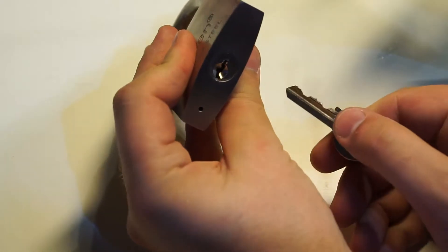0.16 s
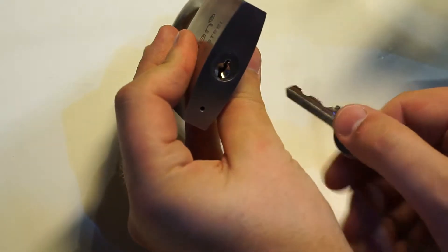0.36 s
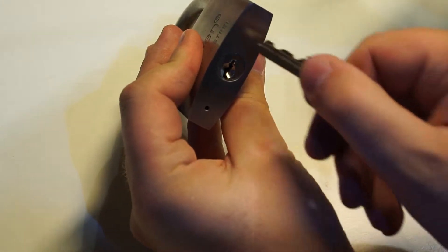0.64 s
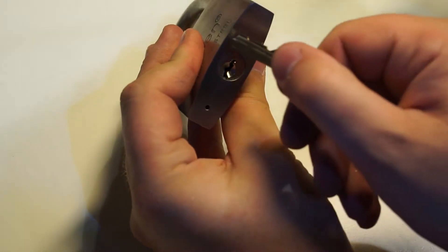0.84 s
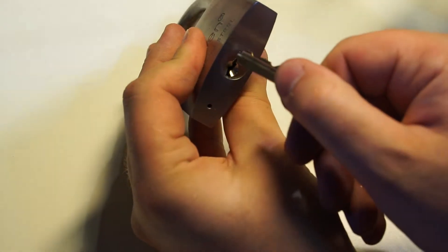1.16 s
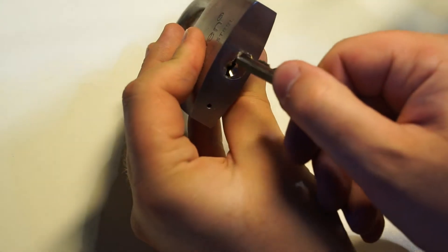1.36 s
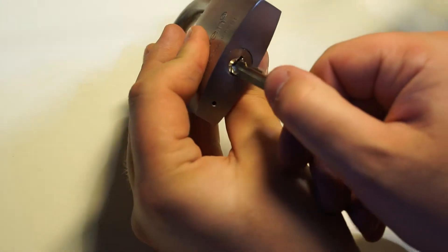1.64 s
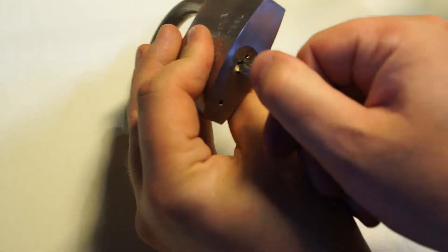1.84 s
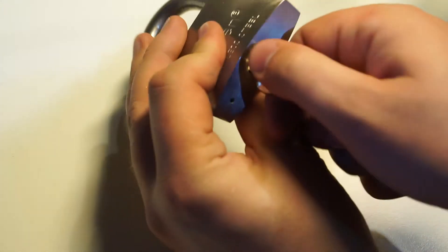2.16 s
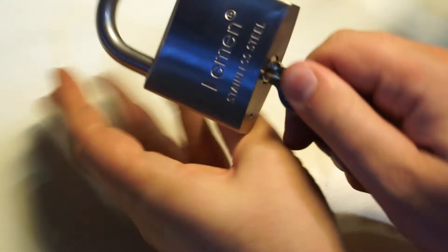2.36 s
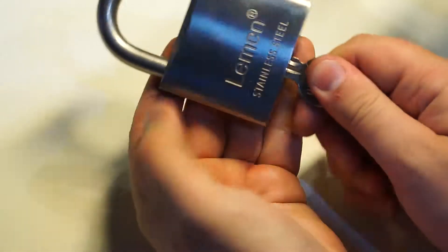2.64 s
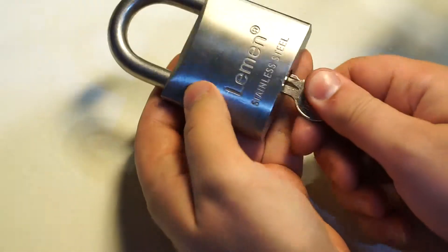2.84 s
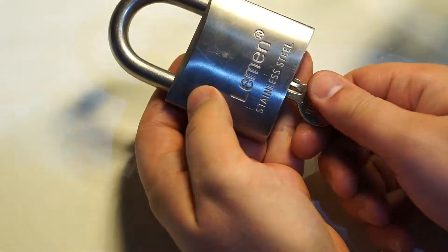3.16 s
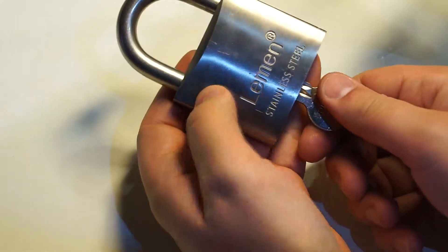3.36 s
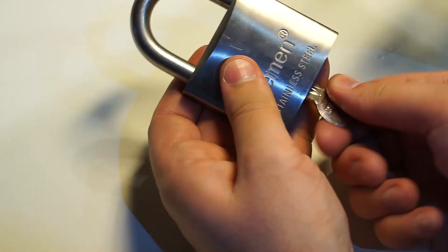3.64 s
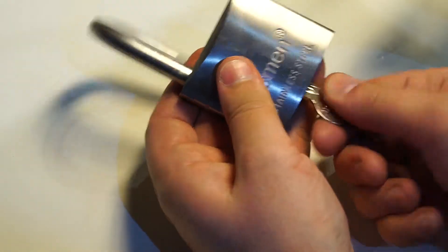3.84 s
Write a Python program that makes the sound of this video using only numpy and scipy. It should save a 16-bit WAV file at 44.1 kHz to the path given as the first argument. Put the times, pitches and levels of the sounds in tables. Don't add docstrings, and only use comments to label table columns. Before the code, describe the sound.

A padlock opens close to the microphone in a small quiet room: faint key taps, a short rasp over pins, soft grip bumps, turning ticks, then a loud rattling shackle clack and one last tick.

```python
import sys
import numpy as np
from scipy import signal
from scipy.fft import rfft, irfft
from scipy.io import wavfile
from scipy.ndimage import uniform_filter1d

SR = 44100
rng = np.random.default_rng(int(sys.argv[2]) if len(sys.argv) > 2 else 0)


def linear_from_db(decibels):
    return 10 ** (np.asarray(decibels, float) / 20)


def master_out(mix):
    frames = np.transpose(np.atleast_2d(mix))
    ceiling = np.clip(frames, -1, 1)
    pcm = np.round(ceiling * 32767).astype(np.int16)
    wavfile.write(sys.argv[1], SR, pcm)


N = 176400

# (time [s], peak level [dB], ring [Hz], dull knock [dB])
SHACKLE_HITS = [(3.7495, -32, 12900, 0), (3.7557, -15, 11500, -5), (3.7594, -7, 14800, -3),
                (3.762, -11, 13000, 0), (3.7648, -6, 13900, -5), (3.7665, -6, 13500, -5),
                (3.768, -6, 7700, -5), (3.7712, -1, 13500, -5), (3.7735, -10, 7700, -5),
                (3.7792, -4, 13000, 3), (3.7812, -6, 13500, 0), (3.784, -10, 12800, 0),
                (3.7872, -9, 13200, 0), (3.7912, -15, 13500, 0), (3.7945, -17, 12800, 0),
                (3.8042, -12, 13700, -3), (3.8062, -15, 7700, 0), (3.8108, -14, 13000, 2),
                (3.8148, -14, 7700, 2), (3.8212, -13, 13100, -5), (3.8265, -16, 13500, 0),
                (3.8475, -20, 10500, 2)]
# (frequency [Hz], density [dB per Hz])
SHACKLE_COLOUR = [(750, -58), (1250, -10.5), (2600, -10.5), (4200, -9.5), (6500, -5.5), (7700, -0.5),
                  (11500, -2.5), (13500, -1.5), (15200, -15)]


def shackle_clack():
    return linear_from_db(0.3) * contacts(SHACKLE_HITS, SHACKLE_COLOUR, crack_s=0.0015, ring_db=-10.5, ring_t60=0.012,
                               knock_hz=4670, body_db=-42)


# (time [s], peak level [dB], ring [Hz], dull knock [dB])
PIN_CLICKS = [(1.9499, -16, 14000, -12), (1.9507, -13, 12700, -12), (1.963, -16, 14200, -8),
              (1.9682, -8, 9500, -8), (1.9768, -15, 13400, -10), (1.9818, -10, 10500, -6),
              (1.9895, -19, 13000, -8), (1.9905, -16, 13600, -6), (1.9958, -21, 10500, 2),
              (1.998, -16, 10800, 2), (2.0036, -18, 11800, 2), (2.0095, -18, 13000, -3),
              (2.0104, -11, 11600, -3), (2.0138, -12, 11800, 4), (2.017, -19, 12000, 0),
              (2.0205, -21, 12000, 0)]
# (frequency [Hz], density [dB per Hz])
KEY_COLOUR = [(900, -60), (1500, -40), (2700, -22), (3800, -11), (5500, -12), (8000, -4), (11500, 3),
              (14800, 3)]


def pin_rasp():
    return linear_from_db(5) * contacts(PIN_CLICKS, KEY_COLOUR, crack_s=0.0004, ring_db=-15, ring_t60=0.005,
                             knock_hz=4100, body_db=-40)


# (time [s], peak level [dB], ring [Hz], dull knock [dB])
KEY_TICKS = [(1.528, -35.5, 12500, 6), (1.6415, -39, 12200, 5), (1.658, -46, 7000, 14),
             (1.8285, -30.5, 14800, 4.5), (1.872, -32, 12300, 2), (1.874, -34.5, 5650, -7),
             (2.3365, -31, 12100, -15), (2.3467, -15, 7700, -6.5), (2.697, -50, 8800, -7),
             (3.415, -44, 3600, 10), (3.6225, -32, 13200, -3), (3.637, -33.5, 7700, 3.5),
             (3.936, -14.5, 12800, 2)]


def key_ticks():
    return contacts(KEY_TICKS, KEY_COLOUR, crack_s=0.00072, ring_db=-19, ring_t60=0.013,
                    knock_hz=4350, body_db=-32)


# (start [s], length [s], level [dB])
METAL_SLIDES = [
    (1.94, .012, -48),
    (1.95, .085, -37),
    (3.7485, .012, -41),
    (3.76, .016, -25),
    (3.792, .08, -25),
]


def metal_slides():
    key = slides(METAL_SLIDES[:2], KEY_COLOUR, body_db=-42, fade=0.25)
    return key + slides(METAL_SLIDES[2:], SHACKLE_COLOUR, body_db=-40, fade=0.25)


# (start [s], length [s], level [dB])
KEY_CHATTER = [
    (1.529, 0.013, -50),
    (1.642, 0.028, -55),
    (1.829, 0.016, -47),
    (1.872, .018, -48),
    (2.3475, .013, -33),
    (3.637, 0.11, -54),
    (3.937, 0.011, -40),
]


def key_chatter():
    return slides(KEY_CHATTER, KEY_COLOUR, body_db=-49, fade=1)


# (start [s], length [s], level [dB])
KEY_SEATING = [
    (1.975, 0.024, -43),
    (1.994, 0.031, -40.5),
]
# (frequency [Hz], density [dB per Hz])
PLUG_COLOUR = [(800, -15), (1400, -6), (2200, 5.5), (3800, -5.5), (5500, 4), (8000, -24)]


def key_seating():
    return slides(KEY_SEATING, PLUG_COLOUR, body_db=-60, fade=0.63)


# (frequency [Hz], level [dB], t60 [s])
BODY_MODES = [(4100, -12, .02), (5475, -12, .02), (7610, -6, .04), (7900, -8, .03), (8500, -9, .03),
              (9960, -9, .02), (11100, -9, .02), (12700, -4, .025), (13100, -2, .03), (13510, -1, .03),
              (13930, -4, .025), (14900, -8, .02)]


def steel_body(pushes):
    return sum(linear_from_db(db) * ring(push, hz, t60) for push, (hz, db, t60) in zip(pushes, BODY_MODES))


def contacts(rows, spectrum, crack_s, ring_db, ring_t60, knock_hz, body_db):
    length = 1500
    t = np.arange(length) / SR
    crack, own = np.zeros(N), np.zeros(N)
    pushes = np.zeros((len(BODY_MODES), N))
    noise = rng.standard_normal((len(rows), length))
    spread_db = rng.normal(0, 2.4, (len(rows), len(BODY_MODES)))
    knock_band = signal.butter(4, [knock_hz / 1.5, knock_hz * 1.7], "band", fs=SR, output="sos")
    for k, (s, db, hz, knock_db) in enumerate(rows):
        envelope = np.exp(-t / crack_s) * (1 - np.exp(-t / 0.0001))
        shape = flat(noise[k] * envelope) * np.exp(-t / crack_s / 4)
        burst = linear_from_db(db - 8) * shape / np.sqrt(np.sum(shape ** 2) / (crack_s * SR / 2))
        i = int(s * SR)
        crack[i:i + length] += burst
        own[i:i + length] += linear_from_db(ring_db) * ring(burst, hz, ring_t60)
        own[i:i + length] += linear_from_db(knock_db + 1.0) * signal.sosfilt(knock_band, burst)
        pushes[:, i:i + length] += burst * linear_from_db(spread_db[k])[:, None]
    return colour(crack, spectrum)[0] + own + linear_from_db(body_db) * steel_body(pushes)


def slides(rows, spectrum, body_db, fade):
    t = np.arange(N) / SR
    scrape = np.zeros(N)
    roughness_db = 2.0 * np.minimum(rng.exponential(1, N), 4)
    grains = rms_one(linear_from_db(roughness_db) * rng.standard_normal(N))
    for s, length, db in rows:
        rise = (t - s) / 0.00035
        fall = (s + length - t) / (fade * length)
        scrape += linear_from_db(db) * np.clip(np.minimum(rise, fall), 0, 1) * grains
    return colour(scrape, spectrum)[0] + linear_from_db(body_db) * steel_body([scrape] * len(BODY_MODES))


def desk(x):
    scatter_db, scatter_s, turns_per_s = -5, 0.0002, 40
    scatter = []
    for k in rng.standard_normal((2, 32)) * np.exp(-np.arange(32) / SR / scatter_s):
        odd = np.concatenate([[0], k[1:], [0], -k[:0:-1]])
        scatter.append(np.convolve(x, np.roll(flat(odd), 32))[32:N + 32])
    turn = 2 * drift(turns_per_s)
    side = linear_from_db(scatter_db) * (np.cos(turn) * scatter[0] + np.sin(turn) * scatter[1])
    return np.array([x + side, x - side]) / np.sqrt(1 + linear_from_db(2 * scatter_db))


# (frequency [Hz], t60 [s])
ROOM_DECAY = [(1000, 0.28), (4000, 0.32), (8000, 0.28), (11500, 0.26), (15000, 0.3)]


def room(x):
    room_db, onset_s = -3.5, 0.015
    t = np.arange(SR // 2) / SR
    edges = 300 * 2 ** np.arange(0, 6, 0.5)
    noise = rng.standard_normal((2, 2, len(t)))
    tail = 0
    for k, (low, high) in enumerate(zip(edges, np.append(edges[1:], 20000))):
        band_pass = signal.butter(2, [low, high], "band", fs=SR, output="sos")
        band = signal.sosfilt(band_pass, noise[k % 2])
        tail = tail + band * linear_from_db(-60 * t / at_hz(ROOM_DECAY, np.sqrt(low * high)))
    tail = tail * np.clip(t / onset_s, 0, 1)
    tail = tail / np.sqrt(np.sum(tail ** 2) / 2)
    return linear_from_db(room_db) * signal.fftconvolve(x[None], tail, axes=1)[:, :N]


# (time [s], level [dB])
FINGER_RUB = [
    (2.49, -58),
    (2.522, -59),
    (2.535, -51),
    (2.555, -55),
    (2.62, -54.5),
    (2.655, -54.5),
    (2.68, -54),
    (2.71, -59),
    (2.76, -66),
]
# (frequency [Hz], density [dB per Hz])
SKIN_COLOUR = [(1470, -35), (2500, -0.5), (4640, -1.5), (8000, -1.5), (12000, 4.5), (14000, 3),
               (15500, 0.5)]


def finger_rub():
    roughness_db = 2.5 * np.minimum(rng.exponential(1, N), 4)
    grains = rms_one(linear_from_db(roughness_db)) * rng.standard_normal((2, N))
    return level(FINGER_RUB) * linear_from_db(4.0 + 1.2 * drift(55)) * colour(grains, SKIN_COLOUR)


# (time [s], peak level [dB], pitch [Hz], t60 [s])
PALM_BUMPS = [
    (2.53, -37, 120, .07),
    (2.54, -29, 95, .08),
    (2.552, -39, 150, .06),
    (2.549, -38, 300, .04),
    (2.556, -42, 520, .03),
    (2.578, -35, 110, .07),
    (3.115, -48, 330, .05),
    (3.4155, -31, 330, .06),
    (3.416, -35, 1150, .025),
    (3.7792, -22, 1250, .015),
]


def palm_bumps():
    out = np.zeros(N)
    for s, db, hz, t60 in PALM_BUMPS:
        push = np.zeros(N)
        push[int(s * SR)] = linear_from_db(db)
        out += signal.lfilter([0.1], [1, -0.9], ring(push, hz, t60))
    return out


# (time [s], level [dB])
GRIP_SHIFT = [
    (2.15, -64),
    (2.3, -58),
    (2.55, -50),
    (2.8, -59),
    (3.0, -60),
    (3.3, -61.5),
    (3.6, -58.5),
    (3.75, -67),
]


def grip_shuffle():
    band_pass = signal.butter(2, [200, 420], "band", fs=SR, output="sos")
    shuffle = rms_one(signal.sosfilt(band_pass, rng.standard_normal(N)))
    return level(GRIP_SHIFT) * linear_from_db(-4.0 + 2.0 * drift(17)) * shuffle


# (frequency [Hz], density [dB per Hz])
RUMBLE_COLOUR = [(12, -63), (20, -19), (87, 1), (134, -9.5), (156, -11.5), (240, -16), (511, -19),
                 (561, -20.5), (800, -24), (1040, -33), (1760, -120)]
# (frequency [Hz], density [dB per Hz])
HISS_COLOUR = [(470, -48), (800, -4.5), (1090, -2.5), (1840, -6.5), (2180, -6), (2600, -10), (12900, -16),
               (15500, -15.5)]


def rumble_and_hiss():
    white = stereo_noise()
    rumble = rms_one(colour(white, RUMBLE_COLOUR)[:, -N:])
    hiss = rms_one(colour(white, HISS_COLOUR)[:, -N:])
    return linear_from_db(-50 + 0.92 * drift(15.4)) * rumble + linear_from_db(-57.5) * hiss


# (frequency [Hz], width [Hz], level [dB])
APPLIANCE_TONES = [(1085, 90, -63), (2190, 70, -61), (9700, 200, -80), (13000, 300, -75)]


def appliance():
    noise, out = stereo_noise(), 0
    for hz, width, db in APPLIANCE_TONES:
        t60 = 1.28 / width
        tone = ring(ring(noise, hz, t60), hz, t60)
        out = out + linear_from_db(db) * rms_one(tone[:, -N:])
    return out


# (frequency [Hz], level [dB])
LENS_TONES = [(10300, -77), (10900, -75), (11500, -74), (14800, -79)]


def lens_whine():
    start_s, length_s, fade_s = 1.04, 0.105, 0.0069
    t = np.arange(N) / SR
    gate = np.clip(np.minimum(t - start_s, start_s + length_s - t) / fade_s, 0, 1)
    return gate * sum(linear_from_db(db + 2.0 * drift(30)) * np.sin(2 * np.pi * hz * t) for hz, db in LENS_TONES)


# (frequency [Hz], left-right correlation [-1 to 1])
CHANNEL_LIKENESS = [(40, 0.97), (100, 1), (200, 0.58), (400, -0.43), (700, -0.34), (1300, -0.26),
                    (4000, -0.22), (14000, -0.11)]


def stereo_noise():
    length = N + SR
    mid, side = rfft(rng.standard_normal((2, length)))
    alike = np.clip(at_hz(CHANNEL_LIKENESS, np.arange(len(mid)) * SR / length), -1, 1)
    return irfft(np.sqrt((1 + alike) / 2) * mid + np.sqrt((1 - alike) / 2) * side * [[1], [-1]])


def drift(rate):
    r = np.exp(-2 * np.pi * rate / SR)
    return rms_one(signal.lfilter([1], [1, -2 * r, r * r], rng.standard_normal(N + SR))[SR:])


def ring(clicks, hz, t60):
    r = linear_from_db(-60 / (t60 * SR))
    w = 2 * np.pi * min(hz, 20000) / SR
    return signal.lfilter([0, np.sin(w)], [1, -2 * r * np.cos(w), r * r], clicks + 1e-18)


def colour(x, spectrum):
    (low, low_db), (high, high_db) = spectrum[0], spectrum[-1]
    points = [(low / 2, low_db - 20)] + list(spectrum) + [(high * 2, high_db - 20)]
    cepstrum = irfft(at_hz(points, np.arange(8193) * SR / 16384) * np.log(10) / 20)
    cepstrum[1:8192] *= 2
    cepstrum[8193:] = 0
    h = irfft(np.exp(rfft(cepstrum)))
    h = h / np.sqrt(np.sum(h ** 2))
    return signal.fftconvolve(np.atleast_2d(x), h[None], axes=1)[:, :x.shape[-1]]


def flat(x):
    f = rfft(x)
    return irfft(f / (np.abs(f) + 1e-12), x.shape[-1])


def rms_one(x):
    return x / np.sqrt(np.mean(x ** 2) + 1e-20)


def at_hz(points, hz):
    p = np.array(points)
    return np.interp(np.log(np.maximum(hz, 1)), np.log(p[:, 0]), p[:, 1])


def level(rows):
    s, db = np.transpose(rows)
    return linear_from_db(np.interp(np.arange(N) / SR, s, db, -140, -140))


def scene():
    lock = shackle_clack() + pin_rasp() + key_ticks()
    lock += metal_slides() + key_chatter() + key_seating()
    hands = finger_rub() + palm_bumps() + grip_shuffle()
    background = rumble_and_hiss() + appliance() + lens_whine()
    return desk(lock) + room(lock) + hands + background


def roll_off(x):
    return signal.sosfilt(signal.butter(12, 16270, fs=SR, output="sos"), x)


def record(dry):
    threshold_db, slope, attack_s, release_db_per_s = -26, 0.55, 0.0015, 28.5
    cutoff_hz, leak_db = 15160, 26
    db = 10 * np.log10(uniform_filter1d(np.mean(dry ** 2, axis=0), size=88) + 1e-12)
    ramp = release_db_per_s * np.arange(N) / SR
    held = np.maximum.accumulate(db + ramp) - ramp
    over = np.maximum(held - threshold_db, 0)
    r = np.exp(-1 / (attack_s * SR))
    mix = dry * linear_from_db(-slope * signal.lfilter([1 - r], [1, -r], over))
    mix = signal.sosfilt(signal.ellip(10, 0.5, leak_db, cutoff_hz, fs=SR, output="sos"), mix)
    return roll_off(mix)


dry = scene()
out = record(dry)
master_out(out)
```